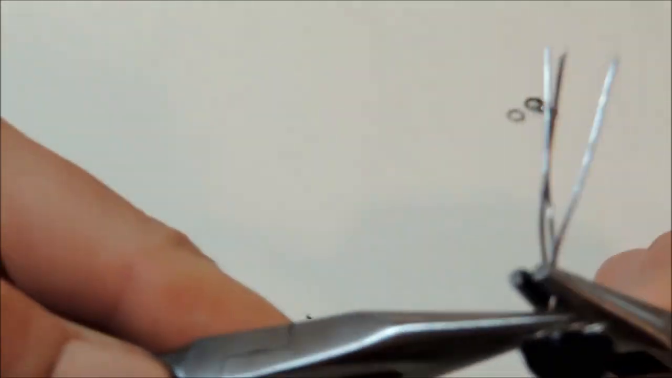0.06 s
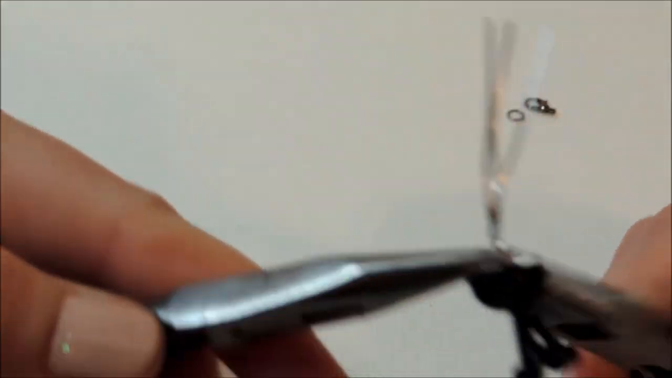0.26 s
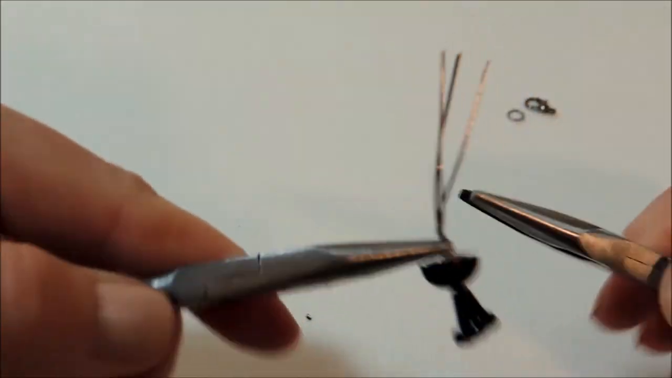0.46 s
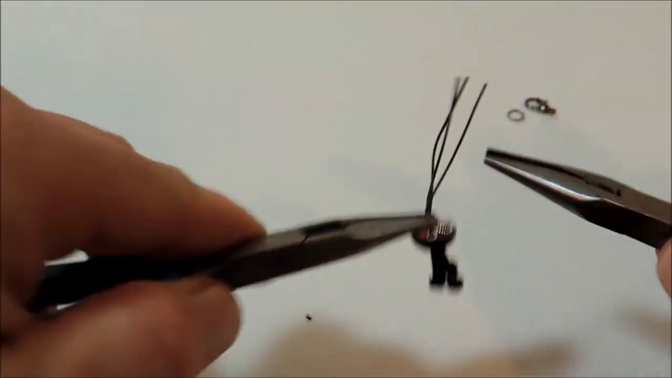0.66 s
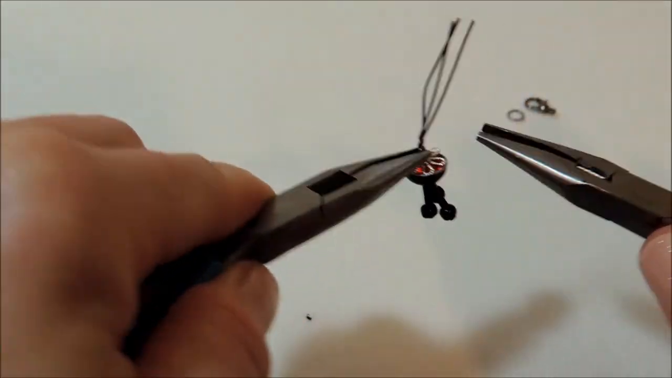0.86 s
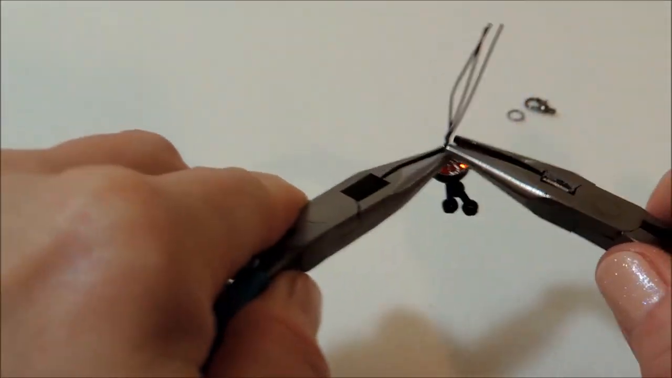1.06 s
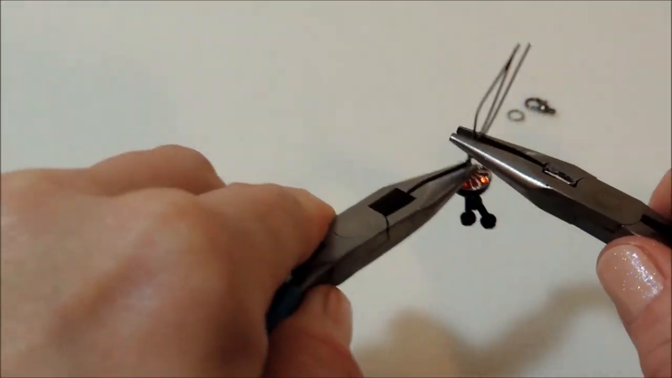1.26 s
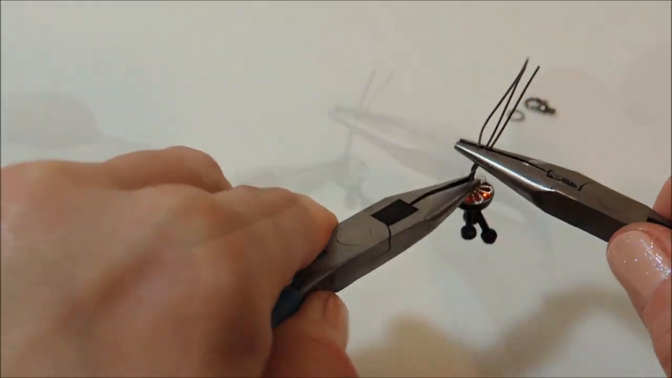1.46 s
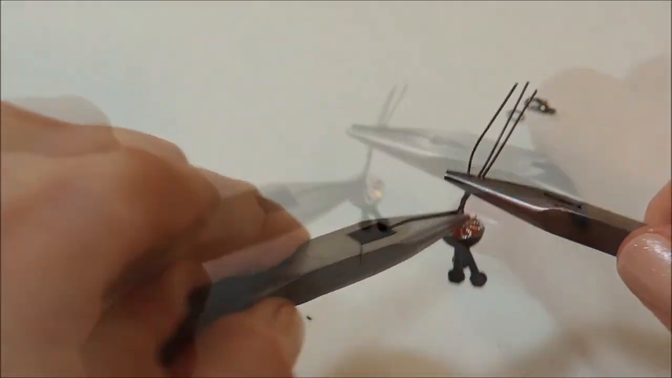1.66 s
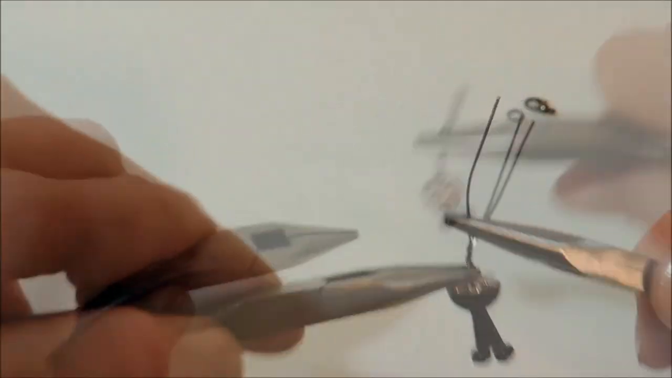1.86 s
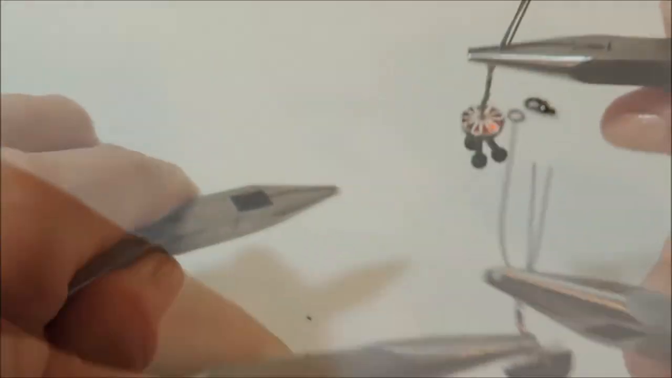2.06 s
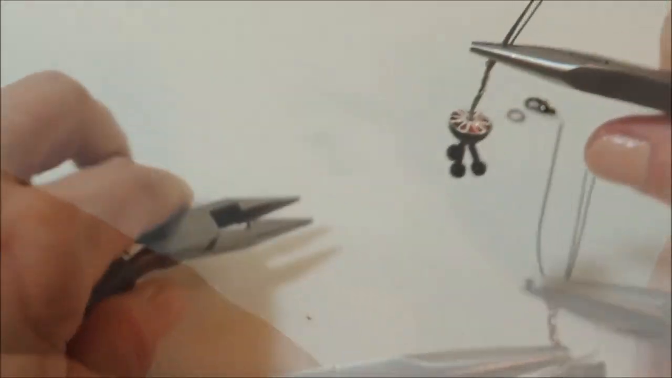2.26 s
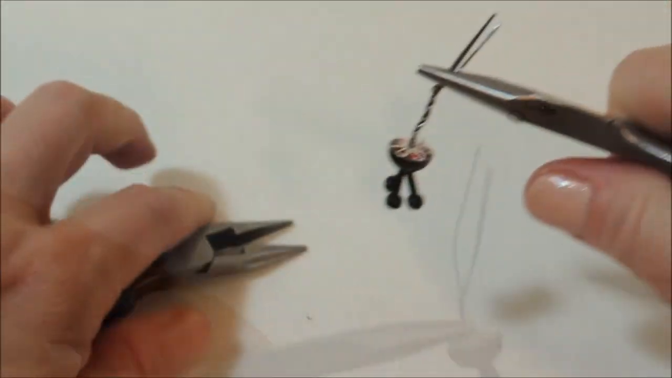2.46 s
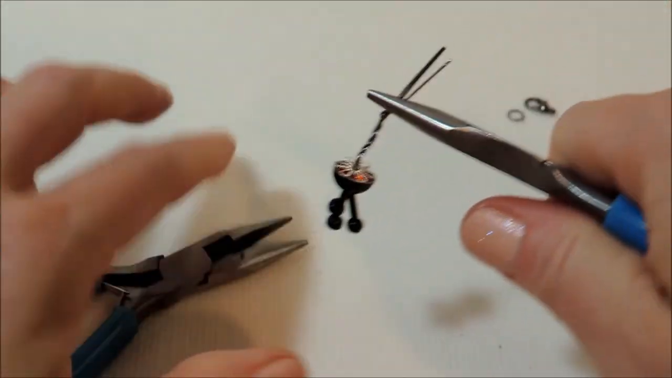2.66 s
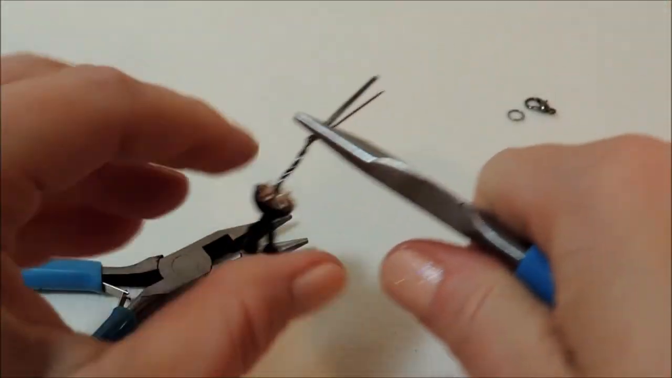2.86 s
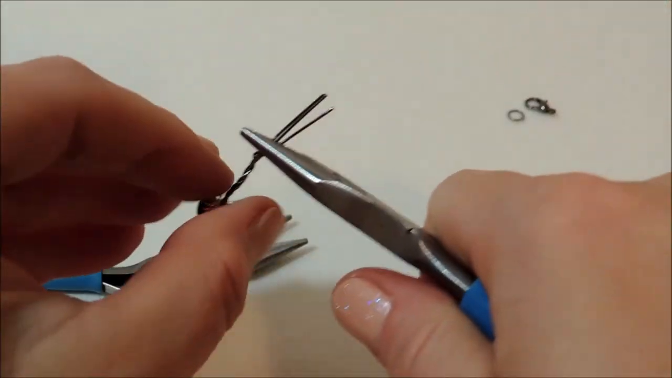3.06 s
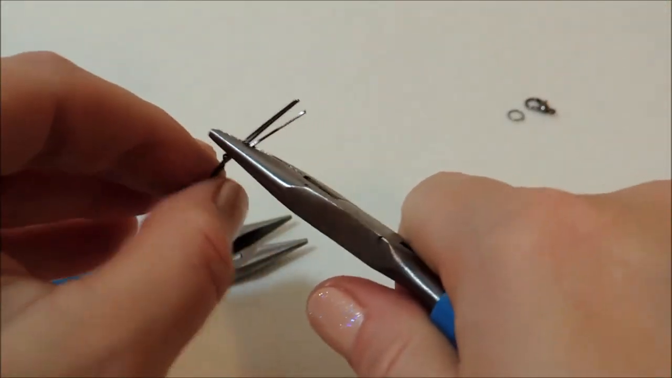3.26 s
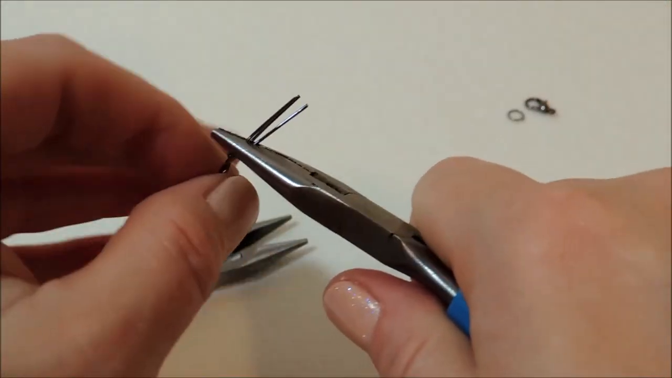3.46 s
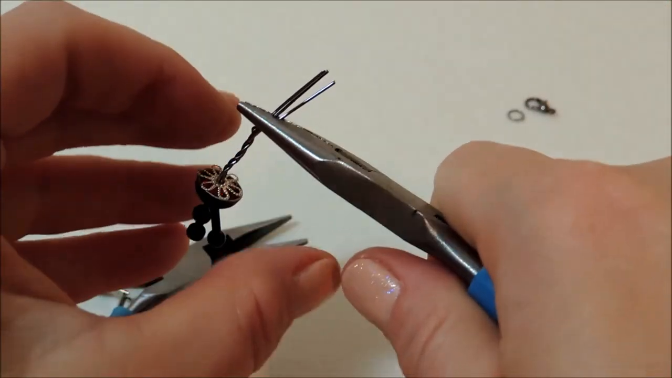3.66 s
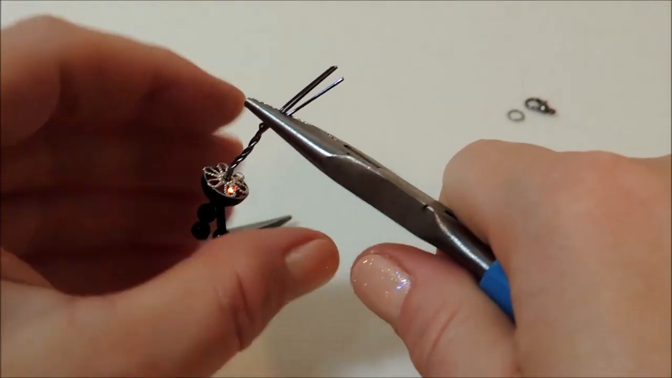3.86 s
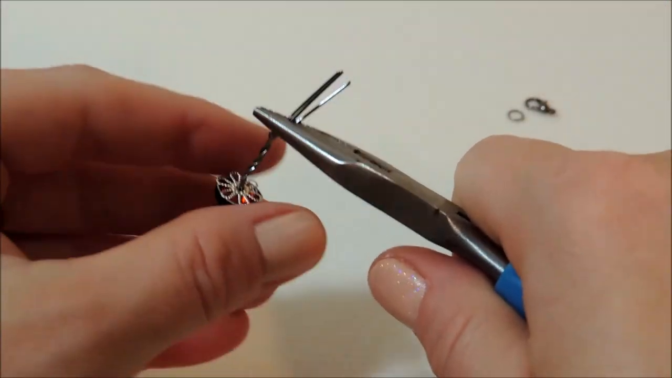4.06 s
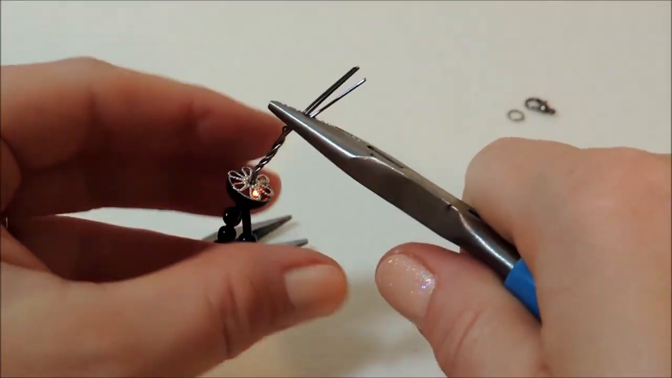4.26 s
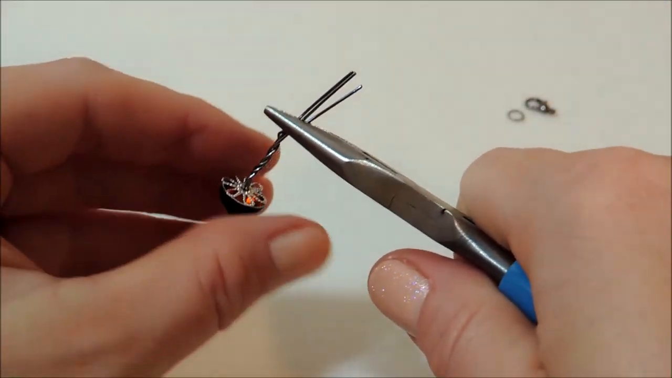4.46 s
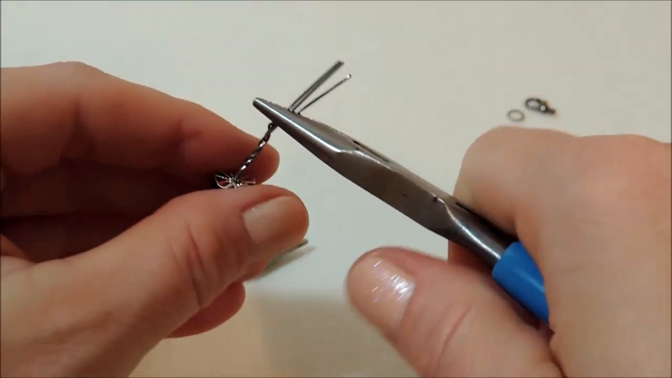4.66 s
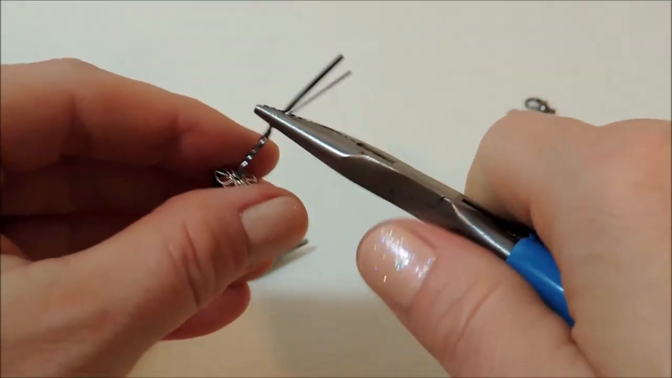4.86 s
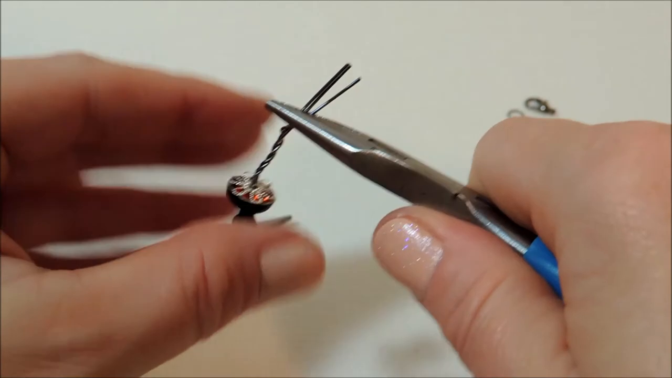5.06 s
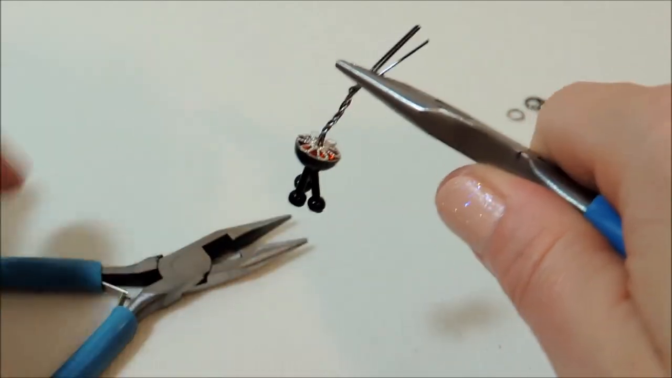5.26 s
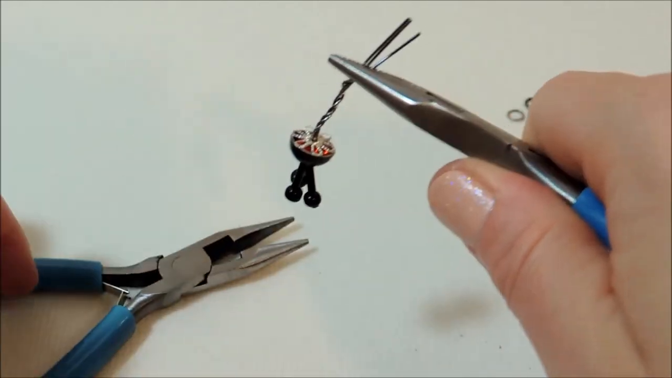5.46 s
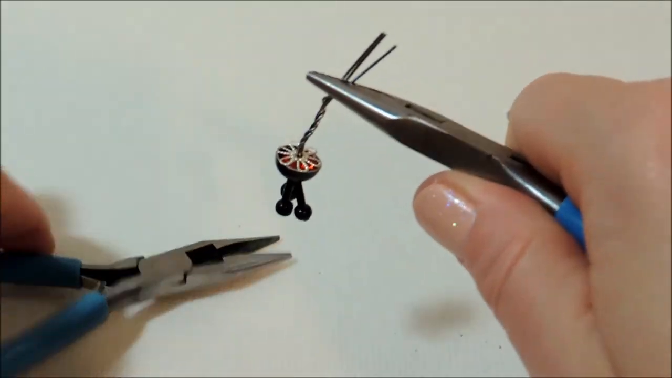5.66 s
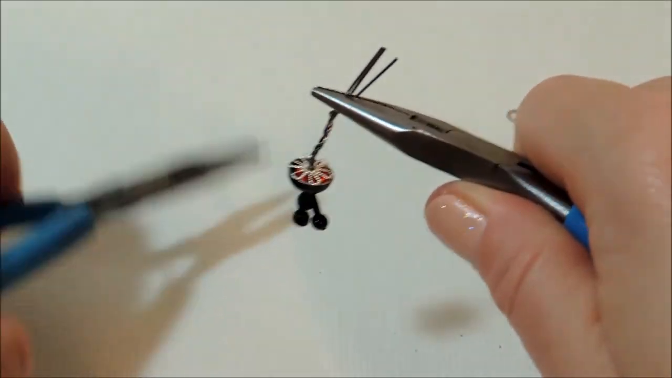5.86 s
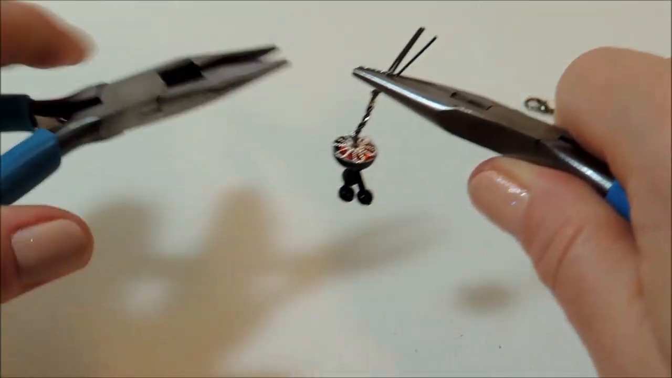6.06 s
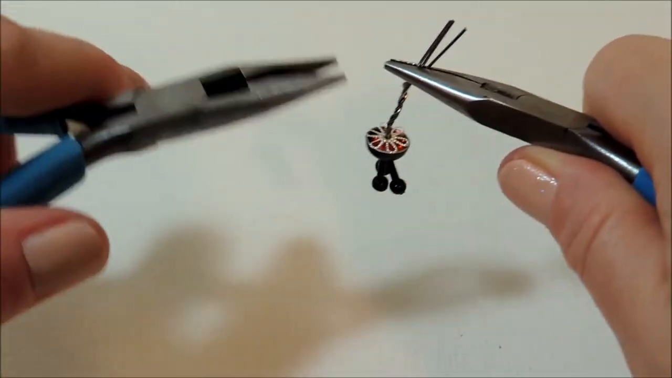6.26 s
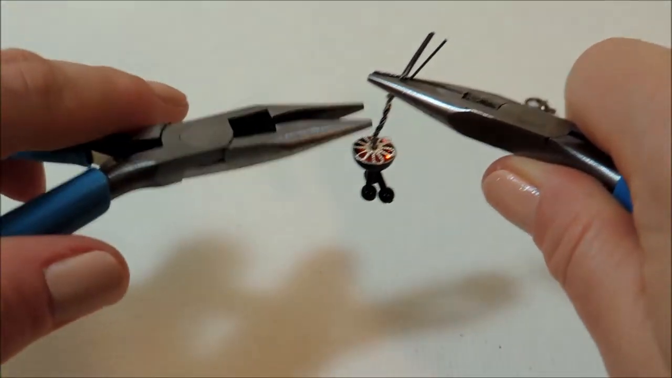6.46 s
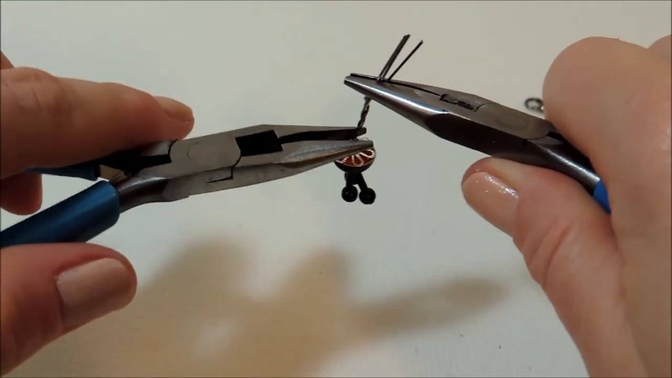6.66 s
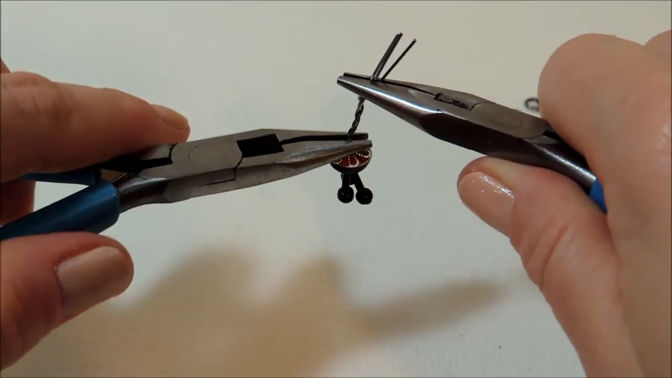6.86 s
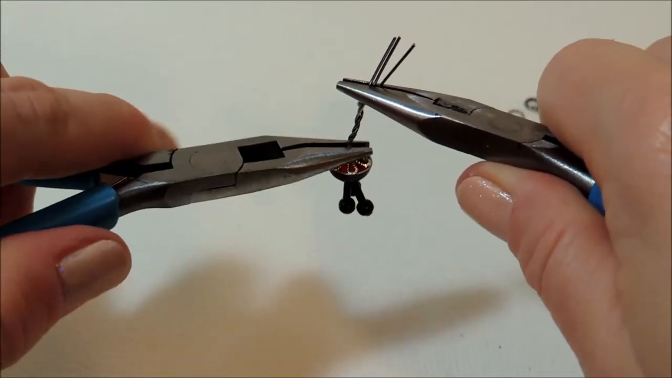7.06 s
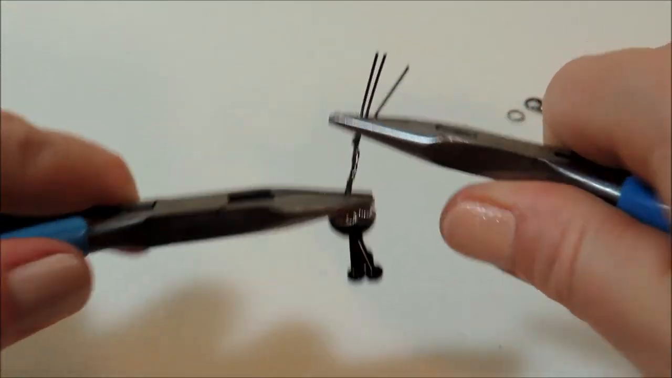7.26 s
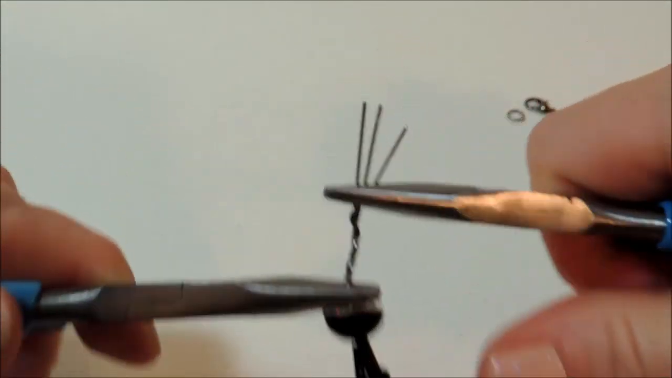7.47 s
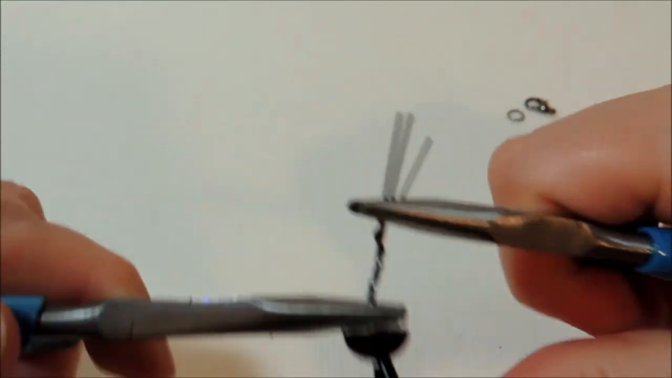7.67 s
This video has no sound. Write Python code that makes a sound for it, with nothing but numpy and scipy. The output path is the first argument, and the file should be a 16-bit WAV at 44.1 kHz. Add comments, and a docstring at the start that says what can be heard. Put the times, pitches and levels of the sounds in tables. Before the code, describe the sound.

A faint electrical hum, low rumble and hiss run throughout in a small, slightly echoing room, with the tools heard close up. Around 0.3 to 0.5 seconds, steel pliers tick and scrape very lightly on thin wire. A small click comes at 1.6 seconds, then a sharp, bright snap of the jaws at 1.9. At 2.5 seconds the table gives a dull thud, and from 2.65 to 2.8 a pair of pliers drops onto it with two loud thumps and a quick steel rattle, the loudest event. It stays quiet until about 5.3 seconds, apart from two barely audible ticks. Near 5.5 seconds the plastic-sleeved handles clack twice with a soft table bump. Faint scrapes follow as the pliers are dragged up, ending in another soft thud near 6 seconds. One tiny tick sounds at 7 seconds, then only the background remains.

```python
"""At a work table in a small, echoing room, two pairs of steel jewelry pliers twist thin wire.
The jaws tick and snap off the wire, steel scrapes, and the plastic-sleeved handles clack.
One pair is dropped: the table top thuds and the steel bounces. Later it is nudged and dragged up again.
Under it all lie a faint electrical hum, the rumble of the room and microphone hiss."""
import sys
import numpy as np
from scipy import signal
from scipy.fft import rfft, irfft, next_fast_len
from scipy.io import wavfile
from scipy.ndimage import uniform_filter1d, map_coordinates

SR = 44100
rng = np.random.default_rng(int(sys.argv[2]) if len(sys.argv) > 2 else 0)


def transcribe(signal):
    """Save signal, clipped to [-1, 1], as a 16-bit WAV file at the path in sys.argv[1]."""
    frames = np.atleast_2d(signal).T
    limited = np.clip(frames, -1, 1)
    pcm = np.round(limited * 32767).astype(np.int16)
    wavfile.write(sys.argv[1], SR, pcm)


N = 340011
TOP_HZ = 14250  # the microphone's upper limit


def amp(db):
    """Turn decibels into a multiplier."""
    return 10 ** (np.asarray(db) / 20)


def unit(x):
    """Scale to an average (rms) size of 1."""
    return x / np.sqrt(np.mean(x ** 2) + 1e-20)


def pan(x, left_db):
    """Make the left side left_db louder than the right."""
    return x * amp([[left_db / 2], [-left_db / 2]])


def curve(points):
    """Join (frequency, value) points into a curve that can be read at any frequency."""
    freqs, values = np.transpose(points)
    return lambda hz: np.interp(np.log(hz + 1), np.log(freqs), values)


def wobble(rate):
    """A smooth random drift through rate points a second."""
    return map_coordinates(rng.standard_normal(int(N * rate / SR) + 4), [np.arange(N) * rate / SR])


def filtered(x, response):
    """Turn each frequency up or down by response(hz)."""
    n = x.shape[-1]
    padded = next_fast_len(n + SR // 10)
    return irfft(rfft(x, padded) * response(np.fft.rfftfreq(padded, 1 / SR)), padded)[..., :n]


def noise(n, tone_db, likeness):
    """Stereo noise shaped by two curves: its tone, and how alike left and right are (1 = the same)."""
    def response(hz):
        angle = np.arccos(np.clip(likeness(hz), -1, 1)) / 2
        return amp(tone_db(hz)) * [np.cos(angle), np.sin(angle)]
    mid, side = filtered(rng.standard_normal((2, n)), response)
    return unit(np.array([mid + side, mid - side]))


def add(track, start, sound):
    """Mix a sound into a track at start seconds."""
    part = track[:, max(round(start * SR), 0):][:, :sound.shape[-1]]
    part += sound[..., :part.shape[1]]


def ring(notes, t, spread, scatter_db=2):
    """A struck object's fading notes, new in strength each hit; spread puts left and right out of step."""
    hz, width, db = np.transpose(notes)[:, :, None]
    size = amp(db + rng.normal(0, scatter_db, db.shape))
    phase = rng.uniform(0, 2 * np.pi, db.shape) + spread * rng.standard_normal((2,) + db.shape)
    tones = size * np.exp(-np.pi * width * t) * np.sin(2 * np.pi * hz * t + phase)
    return tones.sum(1) / np.sqrt(np.sum(size ** 2) / 2)


def brighten(hit, db, rule, pivot_hz):
    """The force of a hit sets its brightness: tip the treble up or down around pivot_hz."""
    full_db, full_tilt, tilt_per_db = rule
    tilt = full_tilt + tilt_per_db * (db - full_db)
    return filtered(hit, lambda hz: amp(tilt * np.log2(np.clip(hz, 500, TOP_HZ) / pivot_hz)))


# tone of the hiss and of the room's rumble: (frequency [Hz], level [dB])
HISS_TONE = [(120, -44), (200, -5), (571, -5.5), (635, -5.5), (745, -7), (1340, -10), (1980, -11),
             (2130, -11.5), (14000, -19.5)]
RUMBLE_TONE = [(10, -13), (25, -1), (60, -4.5), (90, -4.5), (160, -7.5), (230, -14), (400, -18),
               (1000, -89)]
# how alike both are on the left and right: (frequency [Hz], likeness [1 = the same])
BACKGROUND_LIKENESS = [(60, 0.89), (150, 0.43), (380, 0.19), (940, 0.13), (5000, 0)]
# notes of the electrical hum: (frequency [Hz], level [dB])
HUM_NOTES = [(60, -70), (120, -61)]
# when the background is louder: (start [s], end [s])
SWELL_TIMES = [(0, 0.097), (1.365, 2.68)]


def background(hiss_db=-58.5, rumble_db=-62, waver_db=1.15, swell_db=3.5, fade_s=0.056):
    """Hiss, room rumble and a nearly steady hum from the power line; all three swell together."""
    t = np.arange(N) / SR
    hiss = amp(hiss_db) * noise(N, curve(HISS_TONE), curve(BACKGROUND_LIKENESS))
    rumble = amp(rumble_db) * noise(N, curve(RUMBLE_TONE), curve(BACKGROUND_LIKENESS))
    hum = sum(amp(db + waver_db * wobble(3.6)) * np.sin(2 * np.pi * hz * t + 0.042 * wobble(1.3))
              for hz, db in HUM_NOTES)
    raised = sum(1.0 * ((t >= start) & (t < end)) for start, end in SWELL_TIMES)
    swell = uniform_filter1d(raised, size=int(fade_s * SR))
    return (hiss + rumble + pan(hum, left_db=1.2)) * amp(swell_db * swell)


# notes of the steel jaws, wider ones fade faster: (frequency [Hz], width [Hz], level [dB])
JAW_NOTES = [(3920, 47, 3), (4480, 130, -15), (5200, 73, -1), (6740, 67, -2.5), (7960, 100, 11),
             (8270, 95, 4), (9540, 140, 14.5), (11800, 120, -3), (12400, 41, -1), (12600, 150, 5.5)]
# nearby treble reaches left and right out of step: (frequency [Hz], likeness [1 = the same])
STEEL_LIKENESS = [(700, 0.99), (4500, 0.2), (8500, -0.14)]


def steel_hits(hits, tone, rule, hold_s, fade_s, ring_db):
    """Steel chatters for an instant, then fades 60 dB in fade_s, while the jaws ring briefly."""
    out, t = np.zeros((2, N)), np.arange(SR // 10) / SR
    attack = 1 - np.exp(-t / 0.0004)
    chatter = amp(-60 * np.maximum(t - hold_s, 0) / fade_s)
    for start, db in hits:
        crack = chatter * noise(len(t), curve(tone), curve(STEEL_LIKENESS))
        hit = attack * (crack + amp(ring_db) * ring(JAW_NOTES, t, spread=0.41))
        add(out, start, amp(db) * brighten(hit, db, rule, pivot_hz=10300))
    return out


# clicks of the jaws: (time [s], level [dB])
JAW_CLICKS = [(0.315, -50), (0.407, -44.5), (1.6225, -35.5), (1.9061, -15.5), (4.6684, -54), (5.083, -52),
              (6.9654, -45.5)]
# tone of a jaw on wire: (frequency [Hz], level [dB])
CLICK_TONE = [(100, -26), (250, -7.5), (1300, -7), (2800, -10), (3400, -15.5), (4200, -8), (5400, -2.5),
              (6000, -6), (6650, 0.5), (7500, -4.5), (9000, -4.5), (13500, -4), (16000, -6)]
# brightness rule: (full hit [dB], its tilt [dB/octave], extra tilt per dB louder [dB/octave])
CLICK_RULE = (-15.5, 1.96, -0.21)


def jaw_clicks():
    """Jaws slip off the wire or snap shut. A light touch stirs only the thin tips, so it is brighter."""
    clicks = steel_hits(JAW_CLICKS, CLICK_TONE, CLICK_RULE, hold_s=0.0026, fade_s=0.016, ring_db=-13)
    return pan(clicks, left_db=-1.5)


# steel sliding on wire or table: (time [s], length [s], level [dB])
SCRAPE_STROKES = [(0.356, 0.072, -60.5), (0.438, 0.056, -56.5), (2.456, 0.057, -53.5), (5.341, 0.095, -53),
                  (5.713, 0.046, -54), (5.792, 0.079, -51), (5.863, 0.038, -48.5)]
# tone of sliding steel: (frequency [Hz], level [dB])
SCRAPE_TONE = [(150, 11), (700, -0.5), (1700, 2.5), (3500, -2), (7000, 0), (13000, -0.5), (16000, -31)]


def scrapes(rough_db=4):
    """Sliding steel catches and slips in tiny jerks while each stroke swells and fades."""
    out = np.zeros((2, N))
    for start, length, db in SCRAPE_STROKES:
        n = int(length * SR)
        slips = amp(rough_db * unit(uniform_filter1d(rng.standard_normal(SR // 4), size=50)))
        grit = unit(slips * noise(SR // 4, curve(SCRAPE_TONE), lambda hz: 0.17 + 0 * hz))[:, :n]
        stroke = np.sin(np.linspace(0, np.pi, n))
        add(out, start, amp(db) * stroke * grit)
    return out


# knocks of the handles: (time [s], level [dB])
HANDLE_CLACKS = [(1.626, -50.5), (2.095, -45), (5.448, -23.5), (5.5727, -22), (5.684, -37.5),
                 (5.9635, -46.5)]
# tone of a soft knock: (frequency [Hz], level [dB])
CLACK_TONE = [(100, -23), (235, -2.5), (320, -2.5), (620, -1.5), (850, -3), (1200, 3.5), (1700, 3.5),
              (2400, 2.5), (2950, 3), (3500, -4), (4300, -10.5), (6000, -21.5), (14000, -40)]
# notes of the handles: (frequency [Hz], width [Hz], level [dB])
HANDLE_NOTES = [(239, 31, -12), (620, 60, -6), (1126, 90, 3.5), (1615, 50, -2), (2070, 130, -4),
                (2390, 200, 0), (2790, 120, 7), (2860, 120, 0), (3500, 150, -14)]
# brightness rule: (full hit [dB], its tilt [dB/octave], extra tilt per dB louder [dB/octave])
CLACK_RULE = (-21, 0.59, 0.24)


def handle_clacks(rise_s=0.00083, fade_s=0.038, ring_db=-8):
    """The handles knock and ring at middle pitches. A gentle knock stays in the sleeve and is duller."""
    out, t = np.zeros((2, N)), np.arange(SR // 8) / SR
    attack = 1 - np.exp(-t / rise_s)
    likeness = curve([(500, 0.99), (3000, 0.48)])
    for start, db in HANDLE_CLACKS:
        knock = amp(-60 * t / fade_s) * noise(len(t), curve(CLACK_TONE), likeness)
        hit = attack * (knock + amp(ring_db) * ring(HANDLE_NOTES, t, spread=0.35))
        add(out, start, amp(db) * brighten(hit, db, CLACK_RULE, pivot_hz=2010))
    return pan(out, left_db=-0.2)


# weight landing on the table: (time [s], level [dB], contact time [s])
TABLE_THUDS = [(2.474, -14.5, 0.0059), (2.6628, -8, .0014), (2.7493, -7, 0.0043), (5.494, -22.5, 0.0053),
               (5.963, -19, 0.0057)]
# notes of the table top: (frequency [Hz], time to fade 60 dB [s], level [dB])
TABLE_NOTES = [(107, 0.063, -8), (137.6, 0.1, -4), (210, 0.083, -6), (231.3, 0.12, -4), (312, 0.084, 1.5),
               (407, 0.083, -2), (671, 0.17, -8), (850, 0.08, 0), (1180, .05, -16)]


def table_thuds(bass_cut_hz=85):
    """A short push rings the table top; the longer the contact, the fewer high notes answer."""
    out, t = np.zeros((2, N)), np.arange(SR // 3) / SR
    top = sum(amp(db - 60 * t / fade_s) * np.cos(2 * np.pi * hz * t) for hz, fade_s, db in TABLE_NOTES)
    for start, db, contact_s in TABLE_THUDS:
        push = np.sin(np.pi * np.minimum(t / contact_s, 1))
        thud = signal.fftconvolve(top / top[0], push / push.sum())[:len(t)]
        add(out, start, amp(db) * thud)
    bass_cut = signal.butter(2, bass_cut_hz, "high", fs=SR)  # the slowest bending makes little sound
    return pan(signal.lfilter(*bass_cut, out), left_db=1.4)


# the loose pliers touching the table: (time [s], level [dB])
PLIER_BOUNCES = [(2.6375, -44), (2.6645, -10.5), (2.7163, -21.5), (2.7512, -17.5), (2.7747, -27),
                 (5.511, -38.5), (5.581, -34), (5.963, -39), (5.977, -46)]
# tone of steel on the table: (frequency [Hz], level [dB])
BOUNCE_TONE = [(100, -29), (350, -4), (900, -2.5), (1500, -8.5), (2400, -12), (3100, -7.5), (4300, -8),
               (5800, -6), (7000, 4.5), (9000, -2), (12500, 1), (16000, 2)]
# brightness rule: (full hit [dB], its tilt [dB/octave], extra tilt per dB louder [dB/octave])
BOUNCE_RULE = (-13.5, 0.99, 0.091)


def plier_bounces():
    """The loose pliers rattle on the table. A harder landing is a shorter contact, so it is brighter."""
    hits = steel_hits(PLIER_BOUNCES, BOUNCE_TONE, BOUNCE_RULE, hold_s=0.0012, fade_s=0.018, ring_db=-13.5)
    return pan(hits, left_db=0.3)


# how long the room rings: (frequency [Hz], time to fade 60 dB [s])
ECHO_FADE = [(100, 0.31), (500, 0.33), (2000, 0.39), (6000, 0.36), (10000, 0.3), (15000, 0.17)]
# tone of that ringing: (frequency [Hz], level [dB])
ECHO_TONE = [(100, 0.5), (350, -7.5), (1300, -2.5), (3000, -4.5), (7000, -3.5), (14000, 0)]
# echoes from nearby surfaces: (delay [s], level [dB])
FIRST_ECHOES = [(.0078, -10), (.0096, -19), (0.011, -13.5)]


def room_echo(x, tail_db=-5.5, build_s=0.018):
    """Nearby surfaces answer first, then a blur of echoes builds up and dies away."""
    likeness = curve([(150, 0.94), (1000, 0.99), (4000, 0.079)])
    hz, t, bands = signal.stft(noise(SR * 3 // 4, lambda hz: 0 * hz, likeness), SR, nperseg=256)
    fade = amp(-60 * t / curve(ECHO_FADE)(hz)[:, None])
    tail = signal.istft(bands * fade, SR, nperseg=256)[1]
    tail *= 1 - np.exp(-(np.arange(tail.shape[1]) / SR / build_s) ** 2)
    echoes = amp(tail_db) * filtered(tail / np.linalg.norm(tail[0]), lambda hz: amp(curve(ECHO_TONE)(hz)))
    for delay, db in FIRST_ECHOES:
        arrivals = delay + rng.normal(0, 0.0002, 2)  # slightly apart on the left and right
        echoes[[0, 1], np.round(arrivals * SR).astype(int)] += amp(db)
    return signal.fftconvolve(x, echoes, axes=1)[:, :N]


def scene():
    """The pliers and the table, their echo, and the background."""
    tools = jaw_clicks() + scrapes() + handle_clacks() + table_thuds() + plier_bounces()
    return tools + room_echo(tools) + background()


def record(dry):
    """The microphone cuts off the highest treble."""
    return filtered(dry, lambda hz: 1 / np.sqrt(1 + (hz / TOP_HZ) ** 300))


dry = scene()
out = record(dry)
transcribe(out)
```